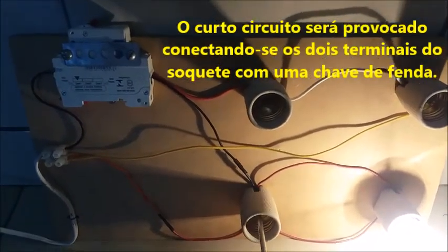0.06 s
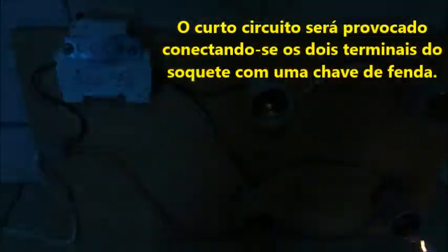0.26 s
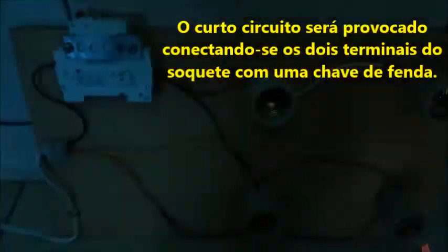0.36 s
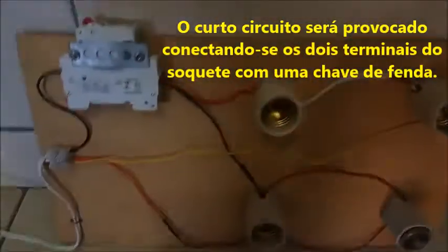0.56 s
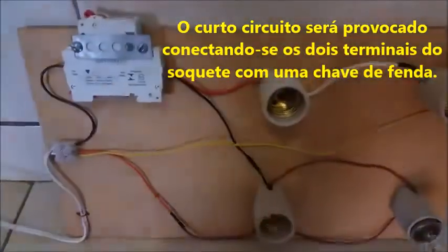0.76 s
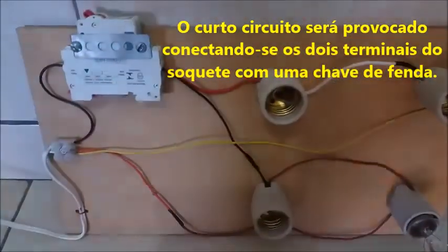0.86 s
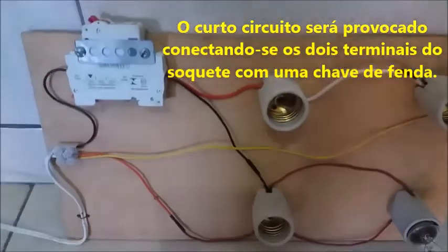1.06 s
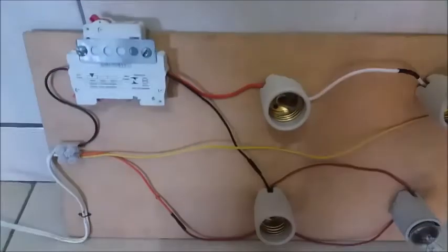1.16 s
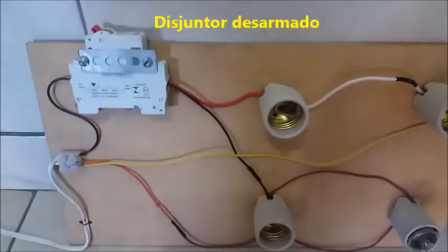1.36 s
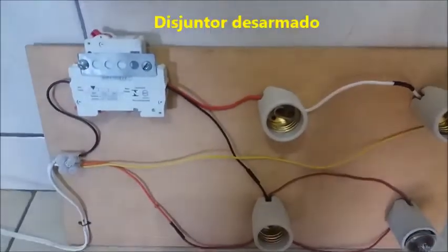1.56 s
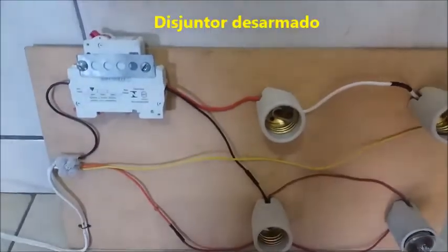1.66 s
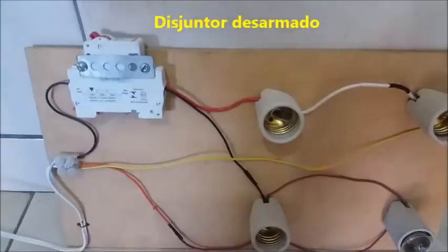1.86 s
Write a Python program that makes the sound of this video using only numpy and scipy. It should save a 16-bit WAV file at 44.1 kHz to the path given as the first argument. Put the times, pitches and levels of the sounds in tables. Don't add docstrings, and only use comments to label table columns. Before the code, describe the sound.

An electrical short snaps with a metallic burst and brief sizzle, a breaker thumps softly, then a knock, a scuff and a loud hard clack ring out in a small tiled room, picked up fairly close.

```python
import sys
import numpy as np
from scipy import signal
from scipy.fft import rfft, irfft
from scipy.io import wavfile

SR = 44100
rng = np.random.default_rng(int(sys.argv[2]) if len(sys.argv) > 2 else 0)


def to_wav(s):
    ch = np.atleast_2d(s).T
    pcm = np.round(np.clip(ch, -1, 1) * 32767)
    wavfile.write(sys.argv[1], SR, pcm.astype(np.int16))


def invert_db(level):
    return 10 ** (np.asarray(level, dtype=float) / 20)


N = 83790

# t/s, level/dB, rattle length/s, room level/dB
SNAP_BLOWS = [(.2378, -20.5, .001, -6), (.2388, -9.5, .001, -1), (.2418, -14, .002, -4.5),
              (.2447, -22.5, .002, -8.5), (.2510, -15.5, .002, -7), (.2555, -22, 0.0014, -11.5),
              (.2682, -18, .003, -4.5), (.2760, -26, 0.0014, -9), (.2860, -23, 0.0034, 12.5),
              (.2932, -16.5, 0.0026, -5), (.3060, -29.5, .003, -6.5), (.3806, -22, .003, -12)]
# f/Hz, level/dB, T60/s
SNAP_MODES = [(480.6, -11.5, .08), (754, -17.5, 0.039), (1170, -14, 0.085), (1400, -11, 0.067),
              (2287, -6, 0.037), (2335, -4, 0.1), (2408, -2.5, 0.061), (2592, -7.5, 0.037),
              (2710, -10, 0.056), (3208, -3, 0.02), (3600, -6, .01), (4600, -8.5, 0.011),
              (5900, -11.5, 0.0034), (10250, -18, .012)]


def snap():
    return blows(SNAP_BLOWS, SNAP_MODES, low_hz=300, crack_db=-10, longest_s=.13)


# t/s, level/dB, T60/s
FIZZ_OUTBREAKS = [
    (.240, -38, 1),
    (.400, -42.5, 0.46),
    (.530, -45, 0.36),
]
# f/Hz, level/dB
FIZZ_COLOUR = [(2000, -22), (3500, 6), (4600, 5), (6500, -10.5), (8500, -7.5), (10500, -11), (12000, -21),
               (16000, -20.5)]


def fizz():
    per_s, spread_db = 14000, 1.5
    t = np.arange(N) / SR
    size = invert_db(spread_db * np.minimum(rng.exponential(1, N), 2))
    sparks = rng.standard_normal(N) * size * (rng.random(N) < per_s / SR)
    colour = invert_db(read(FIZZ_COLOUR, np.fft.rfftfreq(N, 1 / SR)))
    sparks = evened(irfft(rfft(sparks) * colour, N))
    envelope = sum((t > s) * invert_db(level_db - 60 * abs(t - s) / t60) for s, level_db, t60 in FIZZ_OUTBREAKS)
    return sparks * envelope


# t/s, level/dB, rattle length/s, room level/dB
CLACK_BLOWS = [
    (.5244, -5.5, .0006, -18),
    (.5248, -13, 0.0008, -5.5),
    (.5256, -7, .0006, -9),
    (.5269, -20, .0006, -4),
    (.5277, -21.5, .0006, -9.5),
    (.5420, -40, .004, -16.5),
    (.5670, -26.5, 0.015, -21.5),
]
# f/Hz, level/dB, T60/s
CLACK_MODES = [(653, -7.5, 0.024), (1144, -16.5, 0.007), (1350, 1.5, .009), (2310, -6, 0.014),
               (2714, 1, 0.024), (3981, 0, 0.0067), (4973, 2, 0.0064), (6400, -5.5, 0.0041),
               (7540, -6, 0.0057), (8700, -17.5, 0.00633), (12800, -27.5, 0.0036)]


def clack():
    return blows(CLACK_BLOWS, CLACK_MODES, low_hz=450, crack_db=-14, longest_s=.02)


# t/s, level/dB, rattle length/s, room level/dB
KNOCK_BLOWS = [
    (.2495, -27.5, 0.00071, -10),
    (.4015, -18.5, .0006, -3.5),
    (.4535, -29.5, 0.00078, -12.5),
]
# f/Hz, level/dB, T60/s
KNOCK_MODES = [(418, -6.5, 0.26), (490, -10, .06), (670, -7.5, 0.02), (980, -11, 0.017), (1402, -16, 0.21),
               (3670, -14, .008), (4970, -27, .008), (8830, -32, .004)]


def knock():
    return blows(KNOCK_BLOWS, KNOCK_MODES, low_hz=330, crack_db=-30, longest_s=.14)


# t/s, level/dB, rattle length/s, room level/dB
SCUFF_BLOWS = [
    (.4590, -24, .003, -6),
    (.4625, -22, .003, -9.5),
    (.4680, -18.5, 0.012, -2),
    (.4750, -24.5, 0.00067, -4.5),
]
# f/Hz, level/dB, T60/s
SCUFF_MODES = [(558.6, -4, 0.063), (876, -3.5, 0.041), (1000, -6.5, 0.018), (1220, -6.5, 0.022),
               (1322, -10, 0.02066), (2739, -7, 0.013), (4120, -19.5, 0.0047), (5200, -21.5, .008)]


def scuff():
    return blows(SCUFF_BLOWS, SCUFF_MODES, low_hz=400, crack_db=-34, longest_s=.03)


# t/s, level/dB, rattle length/s, room level/dB
THUMP_BLOWS = [
    (.2385, -33.5, .004, -4),
    (.3000, -33.5, .006, -4.5),
    (.5560, -58, .006, 5.5),
]
# f/Hz, level/dB, T60/s
THUMP_MODES = [(113.4, -2, 0.18), (150.9, -1.5, 0.11), (202, -8, 0.2), (269, -11, 0.032)]


def thump():
    return blows(THUMP_BLOWS, THUMP_MODES, low_hz=85, crack_db=-60, longest_s=.3)


def blows(events, modes, low_hz, crack_db, longest_s):
    damped_hz, damped_t60, contact_s, clicks_per_s = 3000, .014, .00005, 1800
    t, u = np.arange(SR // 3) / SR, np.arange(SR // 40) / SR
    ring = np.zeros(len(t))
    for hz, level_db, t60 in modes:
        decay_s = min(t60, longest_s if hz < damped_hz else damped_t60)
        ring += invert_db(level_db - 60 * t / decay_s) * np.sin(2 * np.pi * hz * t)
    ring *= 1 - np.exp(-t / contact_s)
    ring[1] += invert_db(crack_db)
    ring = signal.sosfilt(signal.butter(3, low_hz, "high", fs=SR, output="sos"), ring)
    ring /= abs(ring).max()

    drive = np.zeros(N + SR)
    for s, level_db, length, room_db in events:
        clicks = rng.standard_normal(len(u)) * (rng.random(len(u)) < clicks_per_s / SR)
        clicks[0] = 1.6 * rng.choice([-1, 1])
        clicks = clicks * np.exp(-(u / length) ** 2)
        at = round(s * SR)
        drive[at:at + len(u)] += clicks * invert_db(level_db) / np.linalg.norm(clicks)
        drive[at:at + SR] += room() * invert_db(level_db + room_db)
    return signal.fftconvolve(drive[:N], ring)[:N]


# f/Hz, T60/s
ROOM_DECAY = [(120, 0.76), (400, .55), (1200, 0.71), (2600, 0.66), (5000, 0.58), (9000, 0.31),
              (14000, 0.29)]


def room():
    spacing, gap_s = 12, .0043
    taps = np.zeros(SR)
    at = np.arange(0, SR - spacing, spacing)
    taps[at + rng.integers(0, spacing, len(at))] = rng.choice([-1., 1.], len(at))
    hz, t, z = signal.stft(taps, SR, nperseg=256)
    decay = invert_db(-60 * t / read(ROOM_DECAY, hz)[:, None])
    tail = signal.istft(z * decay, SR, nperseg=256)[1][:SR]
    tail = tail * np.clip(np.arange(SR) / SR / gap_s - .5, 0, 1)
    return tail / np.linalg.norm(tail)


# f/Hz, bandwidth/Hz, level/dB, time of maximum/s, swell width/s
HUM_TONES = [(59, 7, -61.5, 1.4, 5), (104.95, 15, -62, 1.3, 3), (128, 16, -66.5, 0.78, 4),
             (222, 10, -64, 1.5, 0.27), (382.2, 8.9, -71.5, 1.472, 0.266)]


def hum():
    hz, t, out = np.fft.rfftfreq(N, 1 / SR), np.arange(N) / SR, np.zeros(N)
    for centre_hz, width, level_db, top, spread in HUM_TONES:
        z = rfft(rng.standard_normal(N)) / (1 + (2 * (hz - centre_hz) / width) ** 2)
        out += invert_db(level_db) * evened(irfft(z, N)) * np.exp(-((t - top) / spread) ** 2)
    return out


# f/Hz, level/dB (per Hz)
AIR_COLOUR = [(15, -47), (25, -21.5), (64, -2.5), (185, -11), (223, -7.5), (317, -14.5), (1100, -26),
              (1520, -30.5), (16000, -57.5)]


def air():
    hz = np.fft.rfftfreq(N, 1 / SR)
    z = rfft(rng.standard_normal(N)) * invert_db(read(AIR_COLOUR, hz)) * (hz > 20)
    return invert_db(-65) * evened(irfft(z, N))


def evened(x):
    return x / np.sqrt(np.mean(x ** 2) + 1e-20)


def read(points, hz):
    f, value = np.transpose(points)
    return np.interp(np.log(hz + 1), np.log(f + 1), value)


def scene():
    hits = snap() + thump() + knock() + scuff() + clack()
    return (hits + fizz() + air() + hum())[None]


# t/s, gain/dB
GAIN_RIDE = [(0, 10), (.17, 9), (.23, 6), (.3, 4.5), (0.601, 0.5), (.95, -1.5), (1.299, -4), (1.6, -1),
             (1.9, 6)]


def gain_ride(dry):
    s, gain_db = np.transpose(GAIN_RIDE)
    return dry * invert_db(np.interp(np.arange(N) / SR, s, gain_db))


# t/s, length/s, highest kept f/Hz
DROPOUTS = [
    (.468, .012, 8200),
    (.548, .014, 8200),
    (.935, .014, 5200),
    (1.085, .014, 5200),
    (1.298, .014, 4200),
    (1.598, .014, 5200),
]


def starved(x):
    t = np.arange(N) / SR
    for s, length, keep_hz in DROPOUTS:
        low = signal.oaconvolve(x, signal.firwin(101, keep_hz, fs=SR)[None], "same")
        share = np.clip(2.5 - 4 * abs(t - s) / length, 0, 1)
        x = x + share * (low - x)
    return x


def roll_off(x):
    return signal.sosfilt(signal.butter(12, 16640, fs=SR, output="sos"), x)


def record(dry):
    limit, rumble_cut_hz, hiss_db, edge_hz = .8, 55, -88.5, 15900
    x = limit * np.tanh(gain_ride(dry) / limit)
    x = signal.sosfilt(signal.butter(2, rumble_cut_hz, "high", fs=SR, output="sos"), x)
    x = x + invert_db(hiss_db) * rng.standard_normal(N)
    band_limit = signal.firwin(255, edge_hz, window=("kaiser", 5), fs=SR)
    x = signal.oaconvolve(x, band_limit[None], "same")
    mix = starved(x)
    return roll_off(mix)


dry = scene()
out = record(dry)
to_wav(out)
```